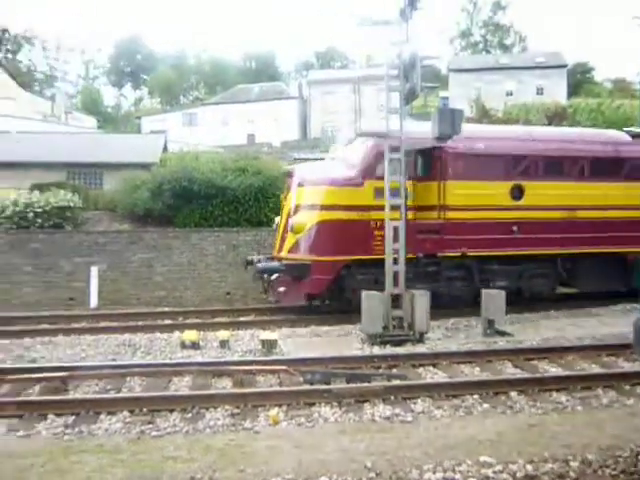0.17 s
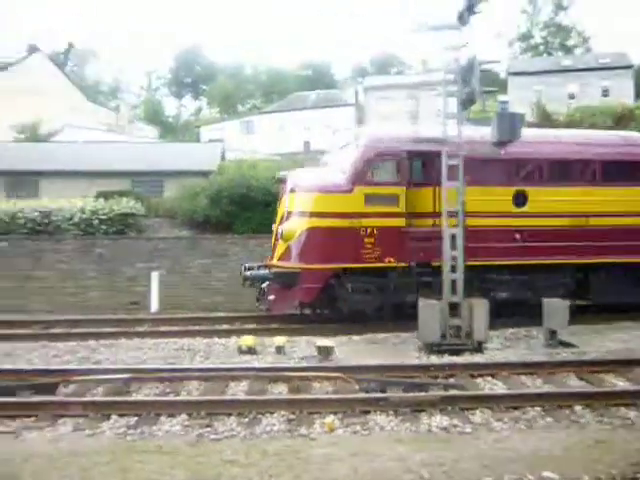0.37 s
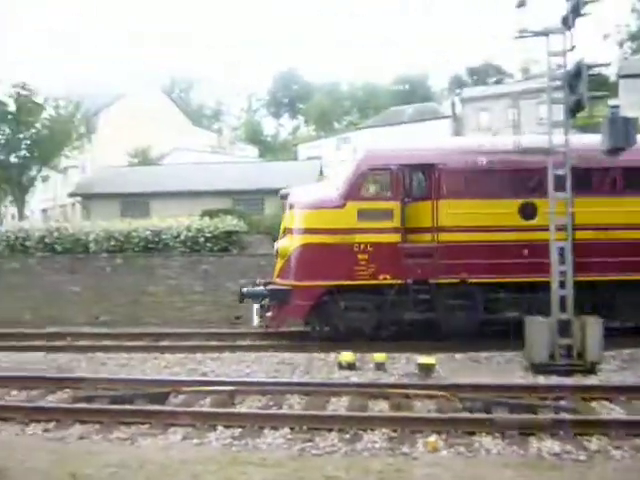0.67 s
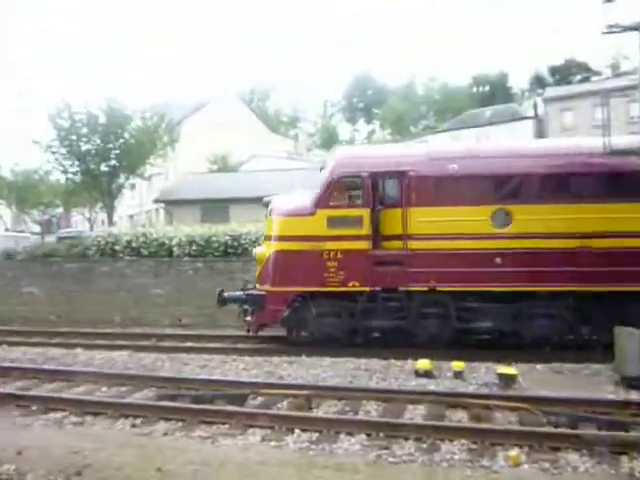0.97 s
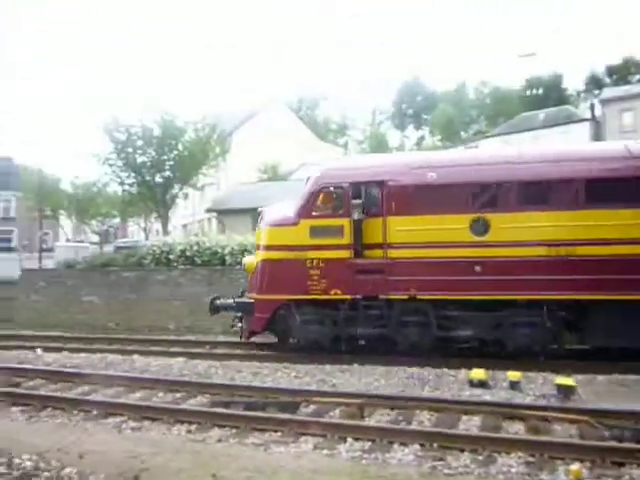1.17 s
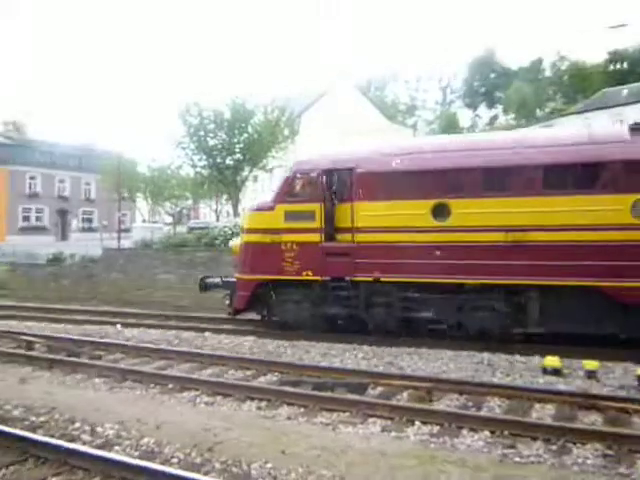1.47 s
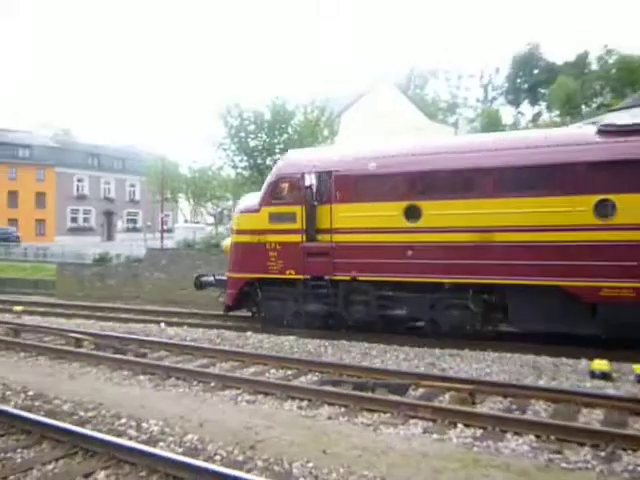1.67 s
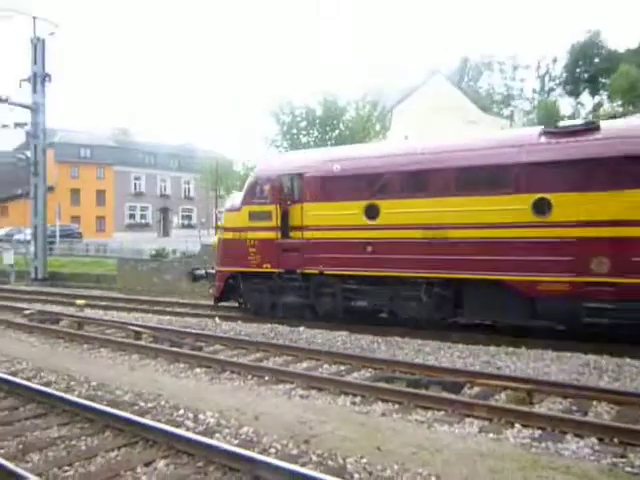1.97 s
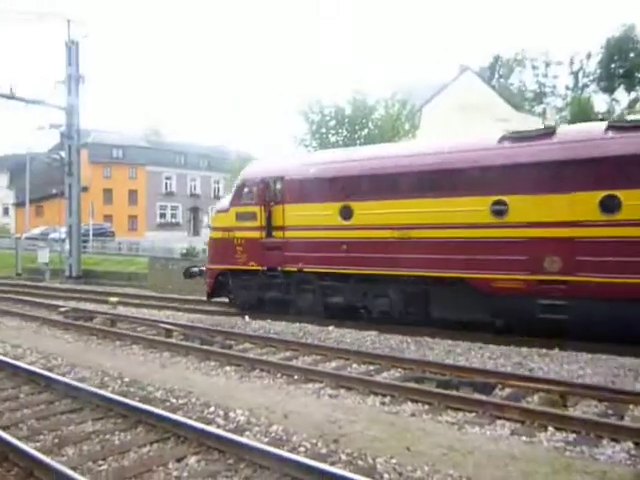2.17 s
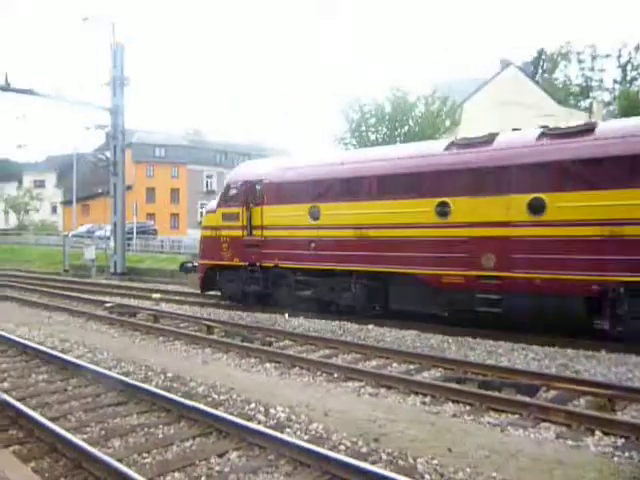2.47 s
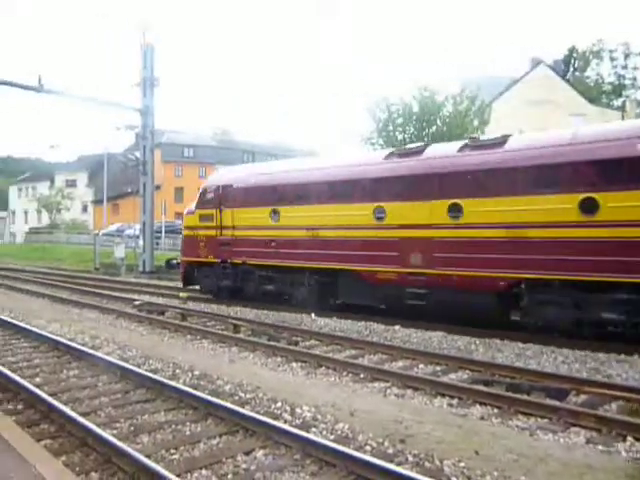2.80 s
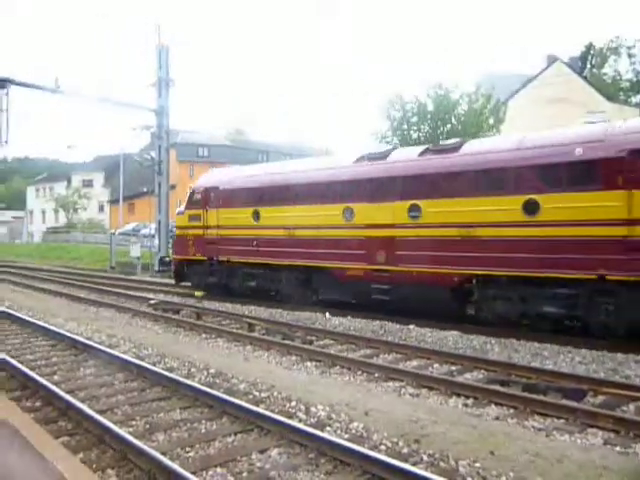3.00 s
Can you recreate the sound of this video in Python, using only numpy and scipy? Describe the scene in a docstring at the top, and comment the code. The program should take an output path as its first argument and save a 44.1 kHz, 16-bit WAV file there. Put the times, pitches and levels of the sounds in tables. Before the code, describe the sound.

A diesel locomotive passes slowly through an open yard, already present at the start and still there after 3 seconds. Its low, uneven throbbing drone stays nearly level beneath wheel roar, faint metallic ringing and soft air hiss. Dull rail-joint thumps and knocks fall around 0.4, 0.7, 1.0, clustered 1.2-1.5, then 1.95, 2.25 and 2.7. Faint dry ticks occur mostly at 0.4-0.8. Small mono microphone.

```python
"""Railway yard, from the platform: a diesel locomotive rolls slowly through, heard on a small microphone.
Uneven firings and noise drive the engine's throbbing drone resonances, over a broad rumble of shaped noise.
Wheels and rails roar and ring faintly as flickering noise and narrow modes, with air hissing above.
Wheels thump and knock over rail joints, and a few small dry ticks sound close by: both are decaying modes."""
import sys
import numpy as np
from scipy import signal
from scipy.fft import rfft, irfft
from scipy.io import wavfile

SR = 44100
rng = np.random.default_rng(int(sys.argv[2]) if len(sys.argv) > 2 else 0)


def store_wav(level_fs):
    """Save 16-bit WAV to argv[1]."""
    pcm = np.round(np.clip(np.atleast_2d(level_fs), -1, 1) * 32767)
    wavfile.write(sys.argv[1], SR, pcm.T.astype(np.int16))


N = 138474  # length in samples


def from_db(db):
    """Amplitude gain of a level in dB."""
    return 10 ** (np.asarray(db) / 20)


def rms_one(x):
    """Scale to rms 1."""
    return x / np.sqrt(np.mean(x ** 2) + 1e-20)


def in_time(rows):
    """Columns of a curve table after its t/s, interpolated to one value per sample."""
    s, *columns = np.transpose(rows)
    return [np.interp(np.arange(N) / SR, s, column) for column in columns]


def drift(rate_hz):
    """Slow random wander with spread about 1: noise through two equal poles at rate_hz."""
    step = 40  # samples between wander points
    pole = np.exp(-2 * np.pi * rate_hz * step / SR)
    noise = rng.standard_normal(N // step + 2002)
    slow = signal.lfilter([1], [1, -2 * pole, pole ** 2], noise)[2000:]  # settled part only
    return np.interp(np.arange(N) / step, np.arange(len(slow)), rms_one(slow - slow.mean()))


def resonance(x, hz, width_hz):
    """Two-pole resonance, scaled to rms 1."""
    radius = np.exp(-np.pi * width_hz / SR)
    poles = [1, -2 * radius * np.cos(2 * np.pi * hz / SR), radius ** 2]
    return rms_one(signal.lfilter([1, 0, -1], poles, x))


def double_resonance(x, hz, width_hz):
    """The same resonance passed twice, for steeper flanks."""
    return resonance(resonance(x, hz, width_hz), hz, width_hz)


def coloured(spectrum, patchy_db, shared):
    """Noise of a given spectrum; quarter-octave bands flicker partly alone, partly together; rms 1."""
    hz, db = np.transpose(spectrum)
    f = np.maximum(np.arange(N // 2 + 1) * SR / N, 1.0)
    shaped = from_db(np.interp(np.log(f), np.log(hz), db)) * rfft(rng.standard_normal(N))
    out = 0
    for centre in np.arange(np.log2(hz[0]), np.log2(hz[-1]) + 0.2, 0.25):  # octaves
        offset = np.clip((np.log2(f) - centre) * 4, -1, 1)
        window = np.cos(np.pi / 2 * offset) ** 2
        flicker = from_db(patchy_db * (shared + drift(26)))
        out = out + irfft(shaped * window, N) * flicker
    return rms_one(out)


def strike(times, levels_db, modes, contact_s):
    """Modes swell during a short contact and ring out, each blow with its own strengths and phases."""
    out = np.zeros(N)
    for hz, mode_db, t60 in modes:
        draws = rng.standard_normal((len(times), 2))
        for s, db, (vary, turn) in zip(times, levels_db, draws):
            t = np.arange(int(t60 * SR)) / SR
            rise = np.sin(np.pi / 2 * np.minimum(t / contact_s, 1)) ** 2
            envelope = rise * from_db(-60 * t / t60)
            level = from_db(db + mode_db + 1.7 * vary)
            start = int(s * SR)
            tone = np.sin(2 * np.pi * (hz * t + turn))
            out[start:start + len(t)] += level * envelope / envelope.max() * tone
    return out


def held(x):
    """A drone resonance whose random beating is partly held level: divided by a power of its envelope."""
    evenness = 0.5  # share of the beating taken out
    return rms_one(x / (np.abs(signal.hilbert(x)) + 0.18) ** evenness)


# Exhaust and body resonances of the engine, f/Hz
DRONE_HZ = [50, 75, 147, 220, 275, 354]
# Nominal width of each resonance, width/Hz; each of its two filter passes is twice as wide
DRONE_WIDTH_HZ = [16, 30, 32, 30, 12, 14]
# Throbbing of the engine drone: t/s, then level/dB of each of the six resonances, before DRONE_SHARE_DB
DRONE_LEVELS = [(0.03, -51, -45.5, -40.5, -30, -27.5, -29), (0.11, -60.5, -49, -33.5, -36, -37, -20.5),
                (0.17, -49, -41, -44.5, -42.5, -27, -34.5), (0.23, -50, -48, -32.5, -33.5, -33.5, -26.5),
                (0.46, -49, -38.5, -36.5, -27, -26, -28), (0.54, -59, -43, -31, -36, -34.5, -34.5),
                (0.72, -43.5, -37, -38.5, -28, -25, -40), (0.77, -56.5, -42, -36, -33, -36, -38),
                (0.89, -49, -37.5, -43.5, -24.5, -24.5, -37.5), (1.12, -60, -46, -38, -35, -29.5, -35),
                (1.2, -47, -51, -31, -33, -37, -39.5), (1.3, -55, -36, -38, -29, -28, -46),
                (1.66, -44, -48.5, -31, -39, -32, -36), (1.77, -54, -38, -32.5, -29, -28, -31.5),
                (1.82, -46, -47.5, -32, -32, -33, -27), (1.86, -57, -52, -31.5, -26, -26, -44),
                (1.94, -48, -29, -40, -29.5, -29.5, -35.5), (2.01, -57, -38.5, -30, -27, -45, -34),
                (2.09, -52, -51, -33.5, -31, -40, -37), (2.22, -48, -32, -26.5, -38, -34, -40),
                (2.29, -39.5, -39, -37, -30, -31.5, -37), (2.42, -50, -42, -29, -30, -33.5, -36),
                (2.51, -41, -42, -42, -30.5, -25, -39), (2.59, -40, -40, -37, -25.5, -37, -28.5),
                (2.74, -48, -52, -34, -28, -33.5, -58), (2.82, -49, -45, -27.5, -29.5, -40, -41),
                (3.08, -52, -37, -35, -28.5, -27, -37), (3.1, -39, -44, -41, -30.5, -31, -39)]
DRONE_SHARE_DB = 1  # added to every drone level
# Spectrum of the broad engine rumble: f/Hz, relative level/dB per Hz
RUMBLE_SPECTRUM = [(15, -31), (25, -17), (36, -20), (49, -20), (97, -7.5), (210, 5), (284, -5), (330, 4),
                   (450, -11.5), (580, -49.5), (990, -120)]
RUMBLE_DB = -29.5  # rms level
FIRINGS_PER_S, FIRING_JITTER = 69, 0.45  # mean rate, timing spread in firing periods
FIRING_SPREAD_DB, FIRING_NOISE = 3, 1.2  # strength spread, noise rms against firings of rms 1


def engine():
    """Uneven firings and exhaust turbulence drive the drone resonances over a broad rumble."""
    draws = rng.standard_normal((400, 2))
    at = (np.arange(400) + FIRING_JITTER * draws[:, 0]) / FIRINGS_PER_S
    keep = (at >= 0) & (at < N / SR)
    firings = np.zeros(N)
    firings[(at[keep] * SR).astype(int)] = from_db(FIRING_SPREAD_DB * draws[keep, 1])
    firings = rms_one(firings)
    out = from_db(RUMBLE_DB) * coloured(RUMBLE_SPECTRUM, patchy_db=-0.5, shared=0)
    signs = [-1, 1, -1, 1, -1, 1]  # polarity of the firings into each resonance
    for sign, hz, width, db in zip(signs, DRONE_HZ, DRONE_WIDTH_HZ, in_time(DRONE_LEVELS)):
        drive = sign * firings + FIRING_NOISE * rng.standard_normal(N)
        out += from_db(db + DRONE_SHARE_DB) * held(double_resonance(drive, hz, 2 * width))
    return out


# Wavering of wheels and air: t/s, roar level/dB, ring level/dB, hiss level/dB, before the trims
ROLLING_LEVELS = [(0.0, -26, -41.5, -45.5), (0.22, -25, -39.5, -47), (0.45, -25, -41, -47.5),
                  (0.67, -25.5, -39, -47), (0.9, -27, -38.5, -46), (1.12, -27, -37.5, -46.5),
                  (1.35, -26.5, -38, -46.5), (1.57, -27, -37.5, -45.5), (1.79, -25.5, -35, -44.5),
                  (2.02, -26, -37, -45.5), (2.24, -25.5, -38, -46), (2.47, -25.5, -37.5, -44.5),
                  (2.69, -25, -36, -45), (2.92, -25, -37, -45), (3.14, -24.5, -37, -45)]
ROAR_TRIM_DB, RING_TRIM_DB, HISS_TRIM_DB = -2.45, 1.25, 3.6
# Spectrum of the roar of wheels on rails: f/Hz, relative level/dB per Hz
ROAR_SPECTRUM = [(240, -33.5), (400, -5), (451, -4.5), (743, -3.5), (1250, -15), (1620, -28.5),
                 (2750, -120)]
# Spectrum of the ring of wheels and rails: f/Hz, relative level/dB per Hz
RING_SPECTRUM = [(710, -14.5), (1200, 3), (1780, 4), (2200, 2), (2470, -2.5), (2800, -9.5), (3640, -40.5),
                 (6160, -120)]
# Spectrum of the air hiss: f/Hz, relative level/dB per Hz
HISS_SPECTRUM = [(1590, -34.5), (2700, 3), (3470, 1.5), (3770, -1), (4230, -1), (5500, -5), (6710, -10.5),
                 (7500, -18), (8000, -23.5), (8300, -28), (8600, -35), (8900, -35), (9300, -39)]
# Modes in which the wheels sing, f/Hz
WHEEL_HZ = [655, 730, 1970, 2205, 2850, 3430, 4240, 4865, 6650]
# The same modes: nominal width/Hz (each of two filter passes is 1.5 times as wide), level/dB before waver
WHEEL_MODES = [(55, -40), (60, -40.5), (90, -49.5), (50, -50), (70, -57), (45, -56.5), (130, -62),
               (100, -62), (220, -63)]
WHEEL_WAVER_DB = 2  # spread of each mode's slow wander


def rolling():
    """Wheels roar on the rails and sing faintly in their modes; air hisses above."""
    roar_db, ring_db, hiss_db = in_time(ROLLING_LEVELS)
    shared = 0.9 * drift(25)  # flicker common to roar, ring and hiss
    roar = from_db(roar_db + ROAR_TRIM_DB) * coloured(ROAR_SPECTRUM, patchy_db=0.64, shared=shared)
    ring = from_db(ring_db + RING_TRIM_DB) * coloured(RING_SPECTRUM, patchy_db=0.7, shared=shared)
    hiss = from_db(hiss_db + HISS_TRIM_DB) * coloured(HISS_SPECTRUM, patchy_db=0.55, shared=shared)
    out = roar + ring + hiss
    for hz, (width, db) in zip(WHEEL_HZ, WHEEL_MODES):
        mode = double_resonance(rng.standard_normal(N), hz, 1.5 * width)
        out += from_db(db + WHEEL_WAVER_DB * drift(2.5)) * mode
    return out


# Wheels over rail joints: t/s, thud level/dB, knock over thud level/dB,
# swell of engine and rolling level/dB (zero or below: no swell)
JOINTS = [(0.407, -15, -6.5, 2), (0.699, -10, -11, 3), (1.001, -12, -6.5, -10), (1.205, -10, -14, 0),
          (1.283, -9, -13, 0.5), (1.33, -15, -16, 0), (1.491, -12.5, -15, -2), (1.947, -12, -8, -4),
          (2.253, -8.5, -9.5, 2), (2.682, -15.5, -6, -2)]
# Dull thud of a joint: f/Hz, relative level/dB, decay by 60 dB t/s
THUD_MODES = [(244.6, -6, 0.021), (297.4, -13.5, 0.18)]
# Brighter knock of a joint: f/Hz, relative level/dB, decay by 60 dB t/s
KNOCK_MODES = [(637, -10, 0.078), (840, -1.5, 0.014), (1063, -9, 0.02)]
JOINT_CONTACT_S = 0.009  # rise time of a blow


def joints():
    """Each rail joint sets off low thud modes and higher knock modes together."""
    s, thud_db, knock_db, _ = np.transpose(JOINTS)
    thuds = strike(s, thud_db, THUD_MODES, JOINT_CONTACT_S)
    knocks = strike(s, thud_db + knock_db, KNOCK_MODES, JOINT_CONTACT_S)
    return thuds + knocks


def swells():
    """Gain of engine and rolling, which rise for a moment at some rail joints."""
    length_s = 0.035
    t = np.arange(N) / SR
    rise_db = np.zeros(N)
    for s, _, _, db in JOINTS:
        rise_db += max(db, 0) * np.sin(np.pi * np.clip((t - s) / length_s, 0, 1))
    return from_db(rise_db)


# Small dry ticks close by: t/s, level/dB
TICKS = [(0.4115, -30.5), (0.6038, -31), (0.6534, -36), (0.7617, -33), (0.775, -33), (1.0425, -43.5),
         (1.1994, -40)]
# Modes of a tick: f/Hz, relative level/dB, decay by 60 dB t/s
TICK_MODES = [(5760, -6.5, .011), (6150, -9.5, 0.0087), (6620, -10.5, 0.016), (7140, -14, .011),
              (7800, -24, .009), (8430, -31, .009)]
TICK_CONTACT_S = 0.0011  # rise time of a blow


def ticks():
    """Brief contacts set off high modes that die within hundredths of a second."""
    s, db = np.transpose(TICKS)
    return strike(s, db, TICK_MODES, TICK_CONTACT_S)


def scene():
    """Everything reaches one microphone."""
    train = (engine() + rolling()) * swells()
    return (train + joints() + ticks())[None]


BASS_CUT_HZ, CUTOFF_HZ = 30, 9300  # high-pass corner, low-pass stopband edge
GAIN_SENSE_S, GAIN_SHARE, GAIN_AIM_DB = 0.08, 0.15, -21  # sensing time, share of a swing taken back, aim
OFFSET = -0.0495  # constant, of full scale


def record(dry):
    """Deep bass is lost, gain ducks after loud moments, the top is cut; the converter sits below zero."""
    thin = signal.sosfilt(signal.butter(2, BASS_CUT_HZ, "high", fs=SR, output="sos"), dry)
    memory = np.exp(-1 / (GAIN_SENSE_S * SR))
    start = [[from_db(2 * GAIN_AIM_DB)]]  # sensing starts near the aim
    power = signal.lfilter([1 - memory], [1, -memory], thin ** 2, zi=start)[0]
    excess_db = 10 * np.log10(power + 1e-9) - GAIN_AIM_DB
    even = thin * from_db(-GAIN_SHARE * excess_db)
    low_pass = signal.cheby2(14, 50, CUTOFF_HZ, fs=SR, output="sos")
    return signal.sosfilt(low_pass, even) + OFFSET


dry = scene()
out = record(dry)
store_wav(out)
```